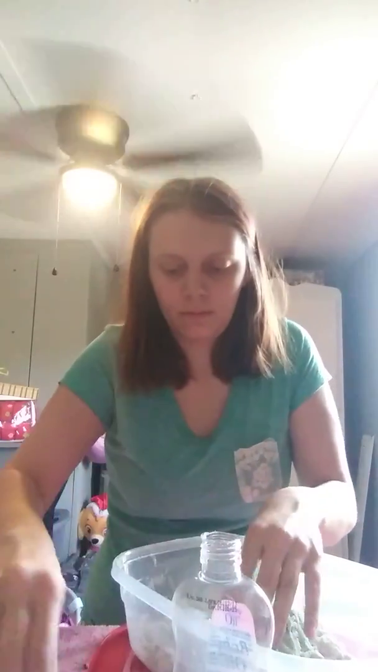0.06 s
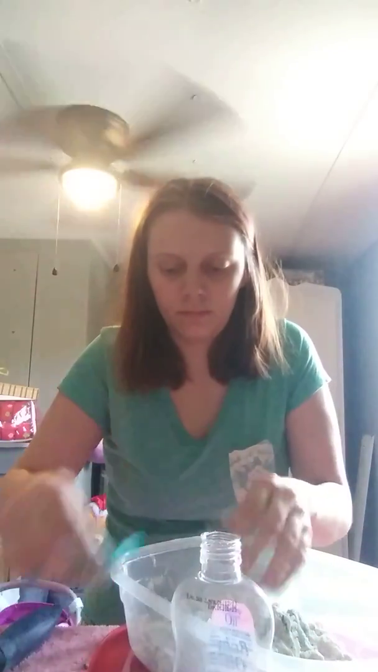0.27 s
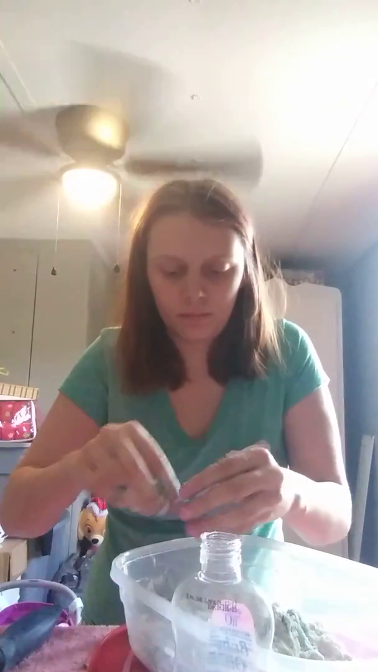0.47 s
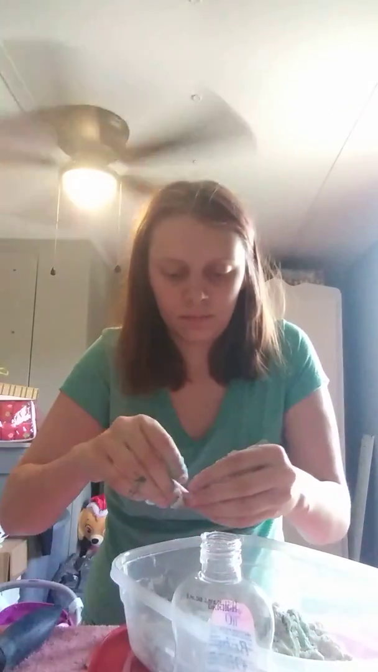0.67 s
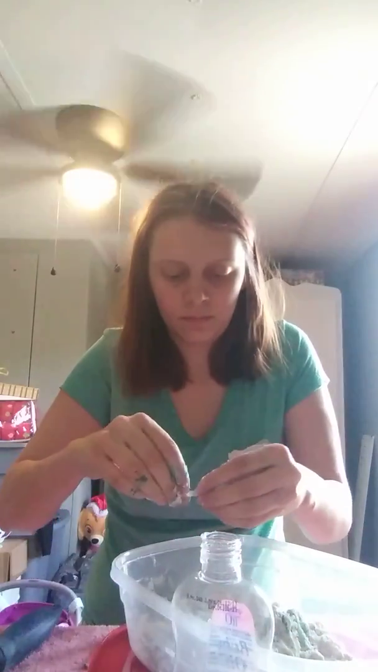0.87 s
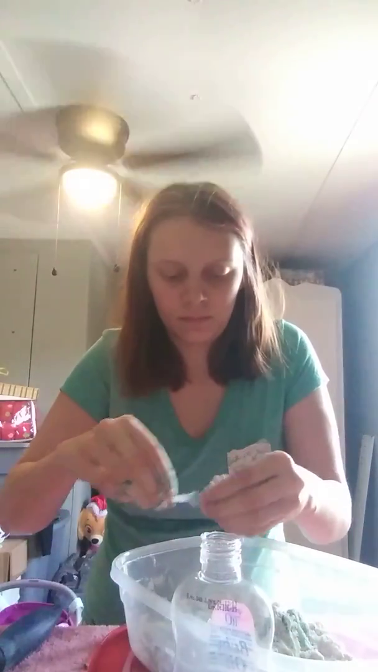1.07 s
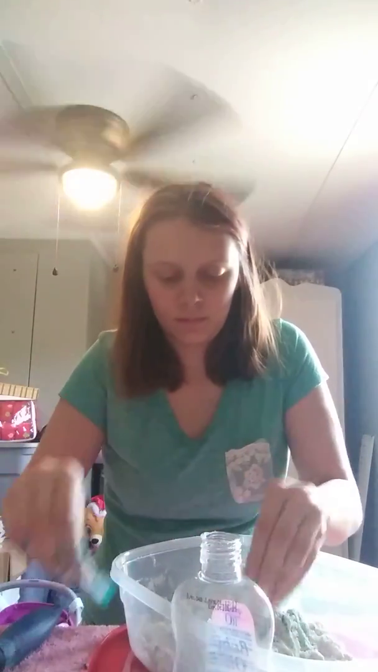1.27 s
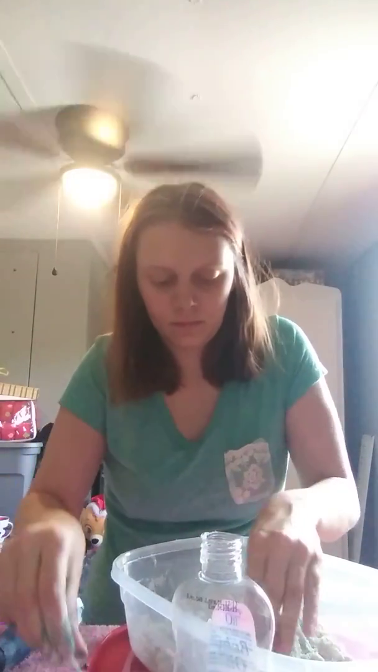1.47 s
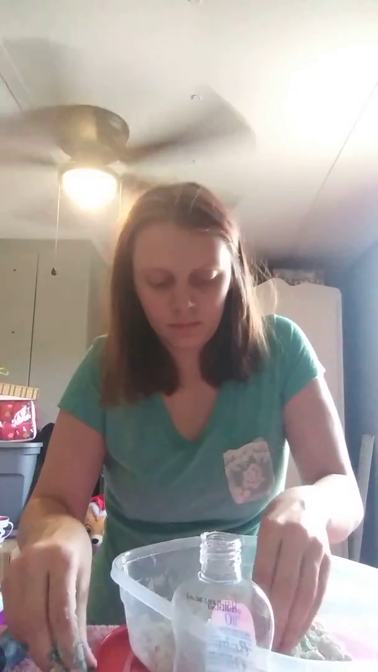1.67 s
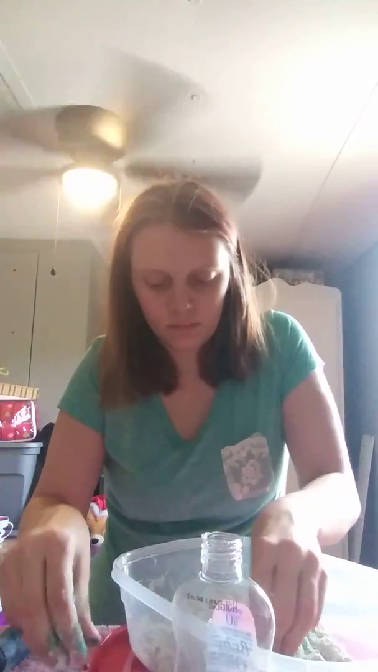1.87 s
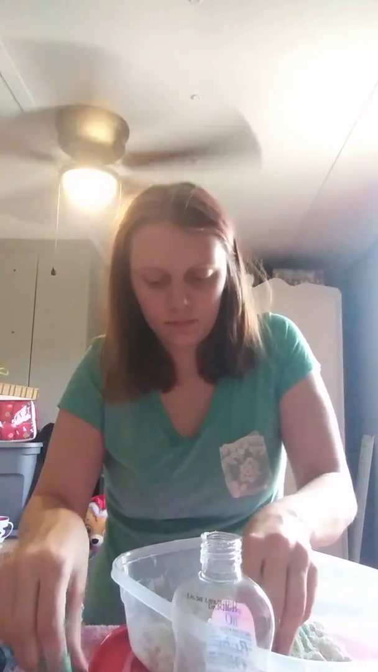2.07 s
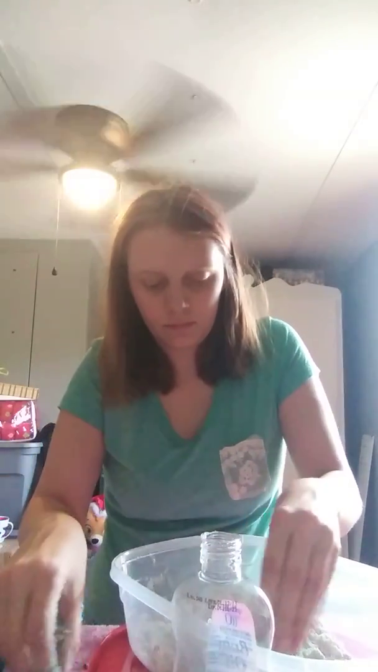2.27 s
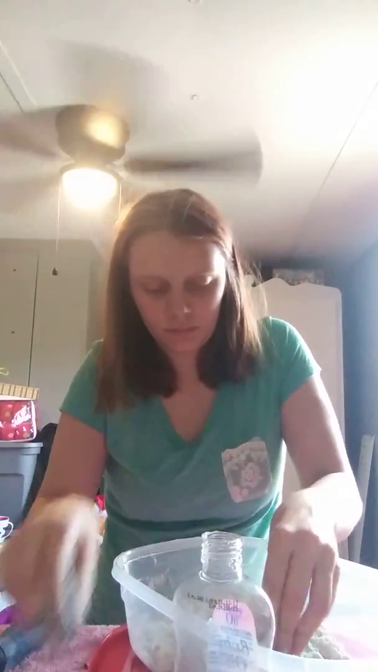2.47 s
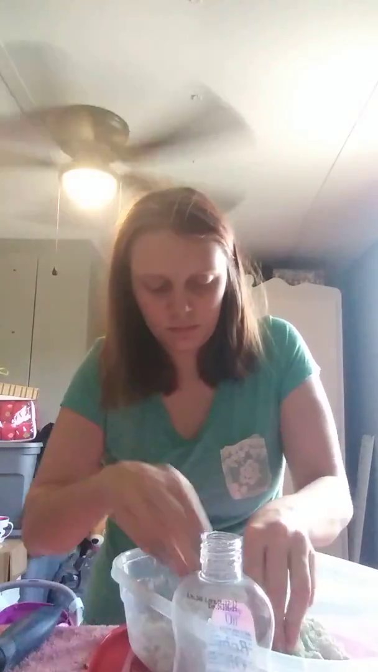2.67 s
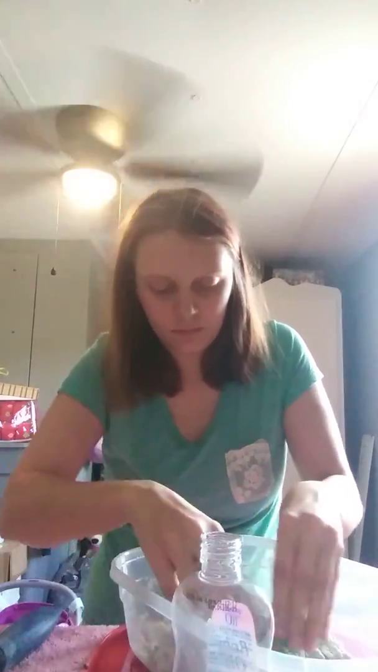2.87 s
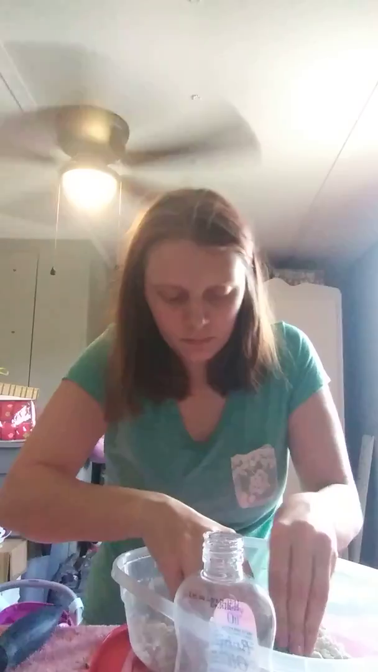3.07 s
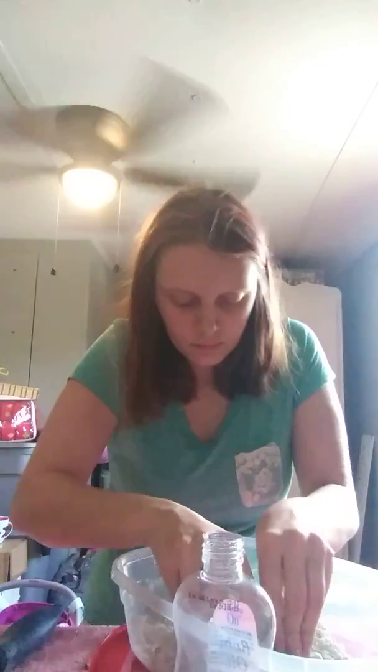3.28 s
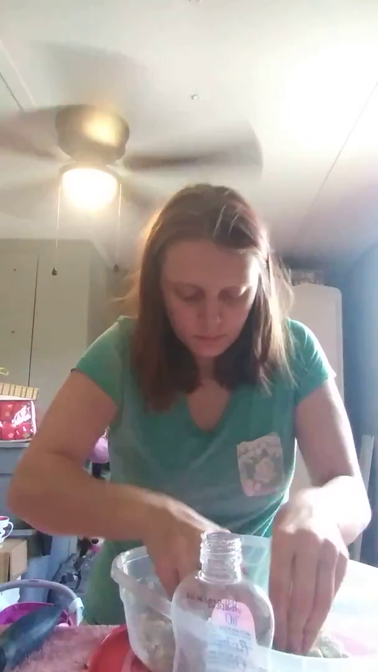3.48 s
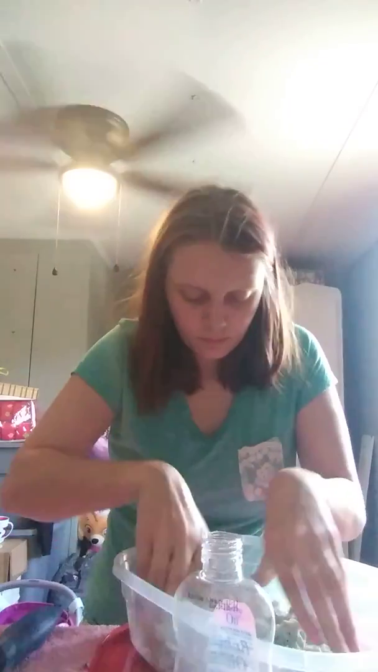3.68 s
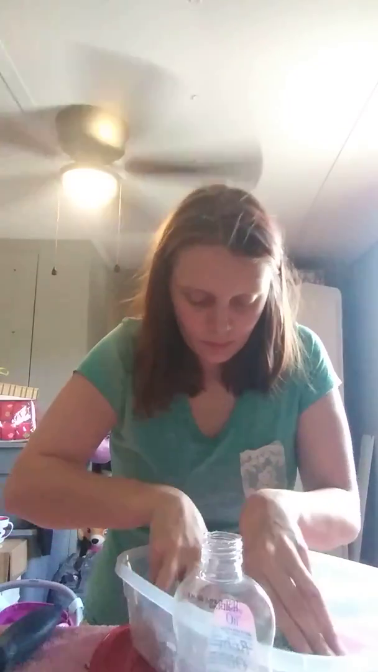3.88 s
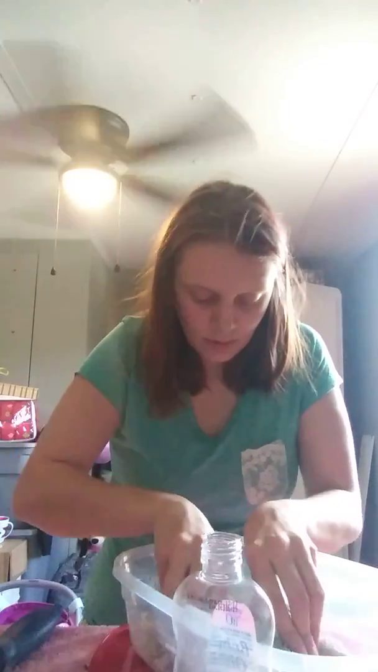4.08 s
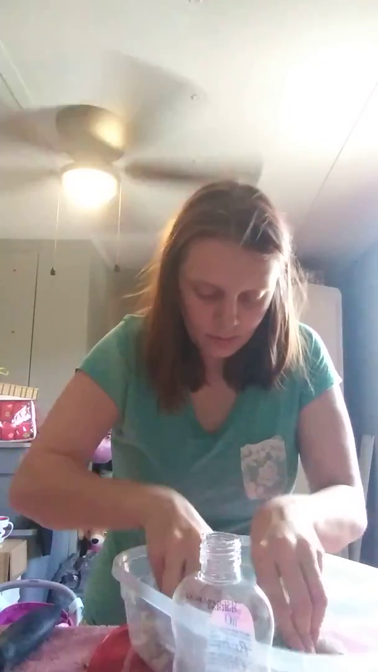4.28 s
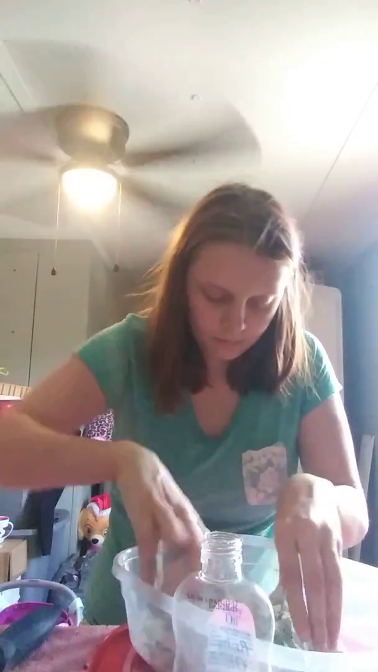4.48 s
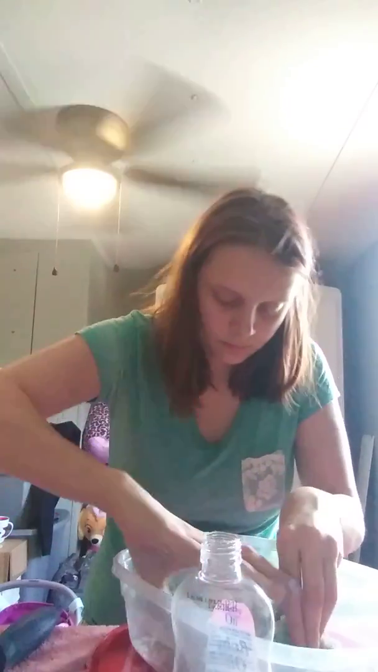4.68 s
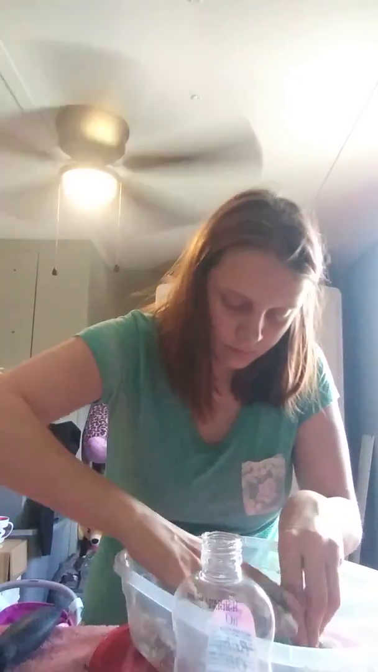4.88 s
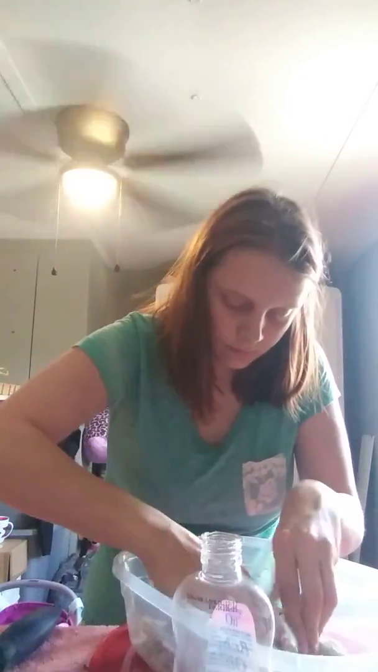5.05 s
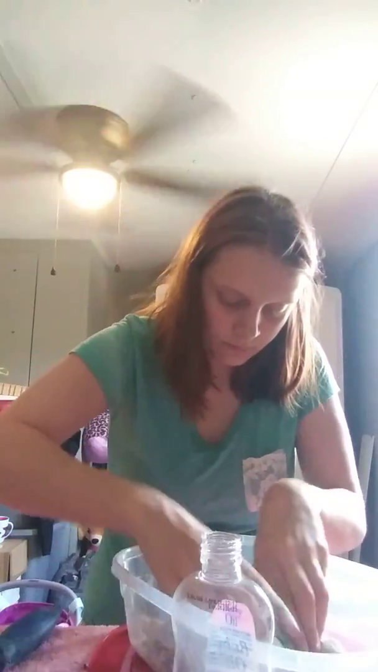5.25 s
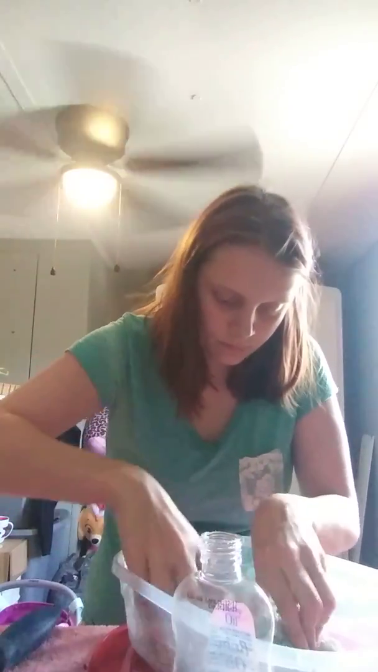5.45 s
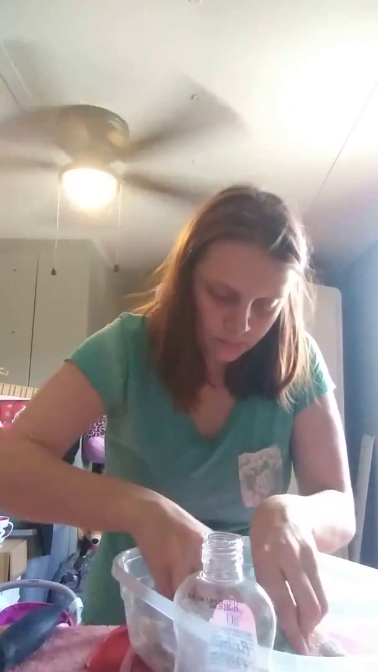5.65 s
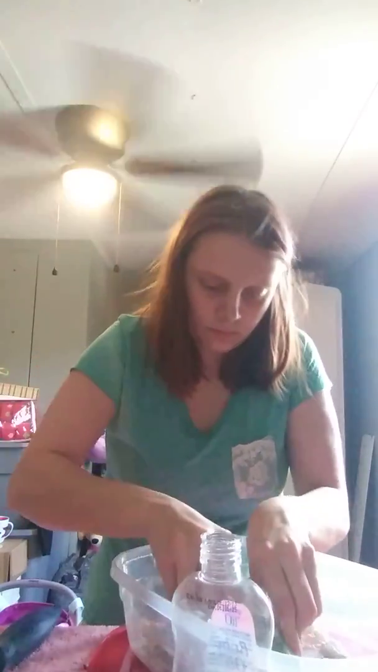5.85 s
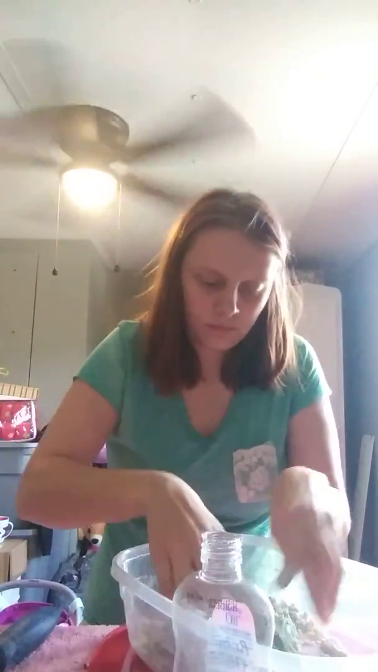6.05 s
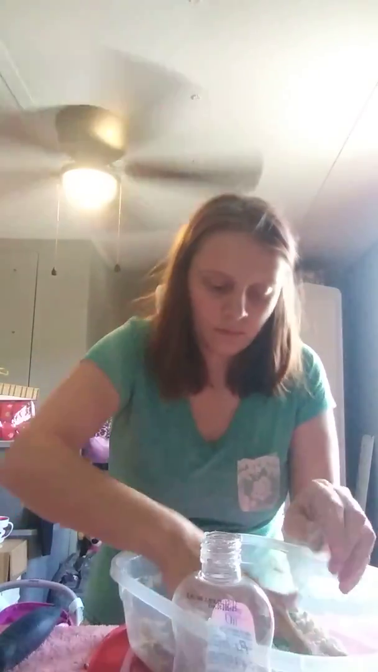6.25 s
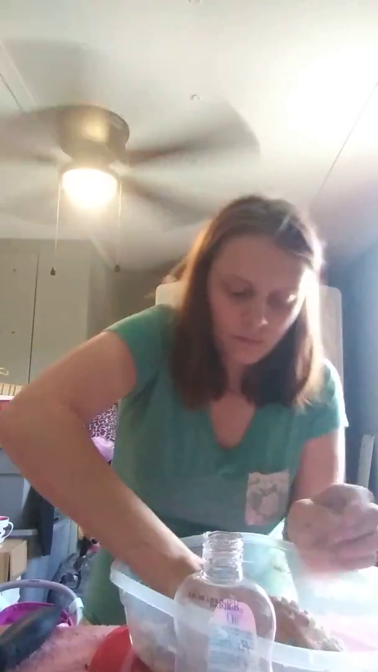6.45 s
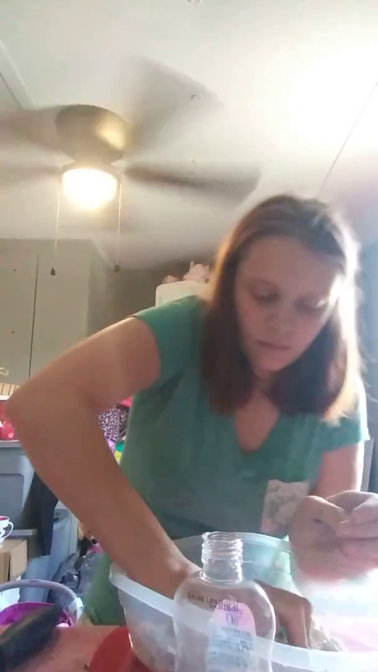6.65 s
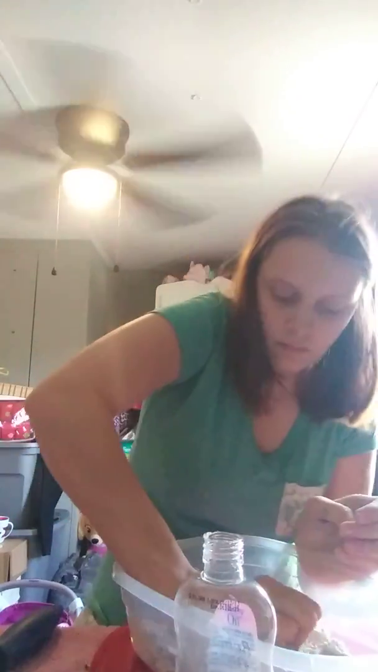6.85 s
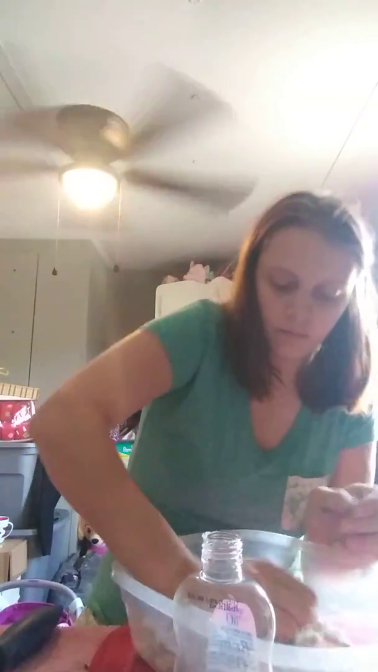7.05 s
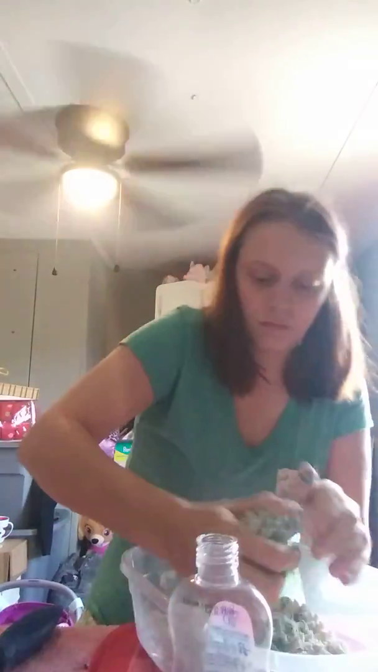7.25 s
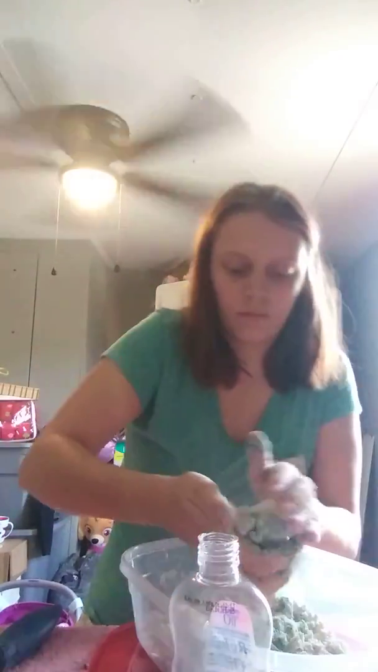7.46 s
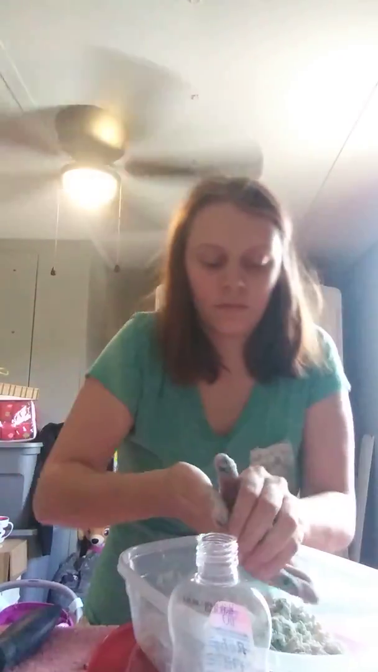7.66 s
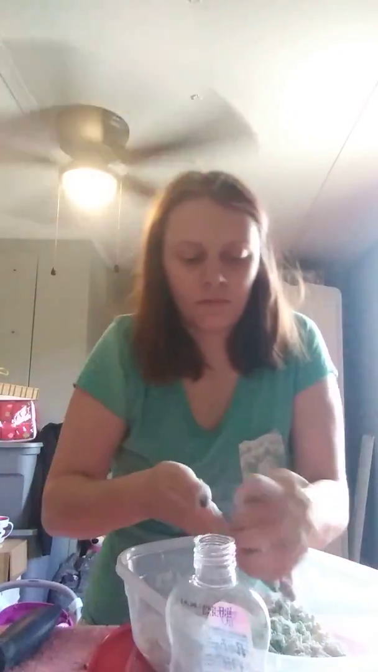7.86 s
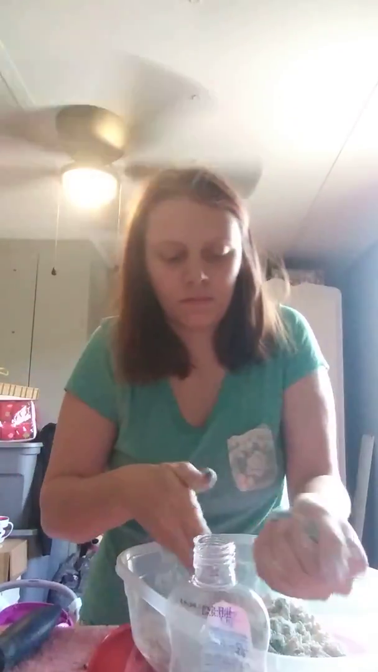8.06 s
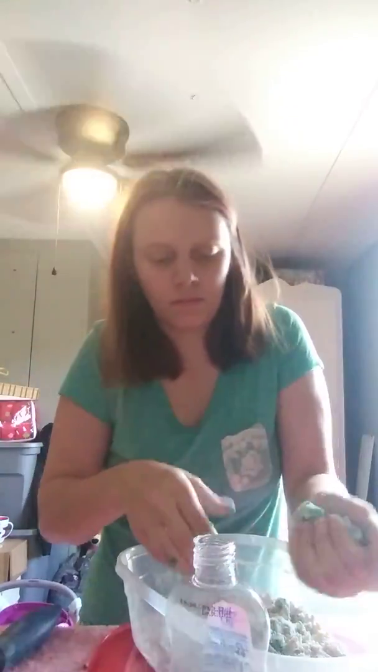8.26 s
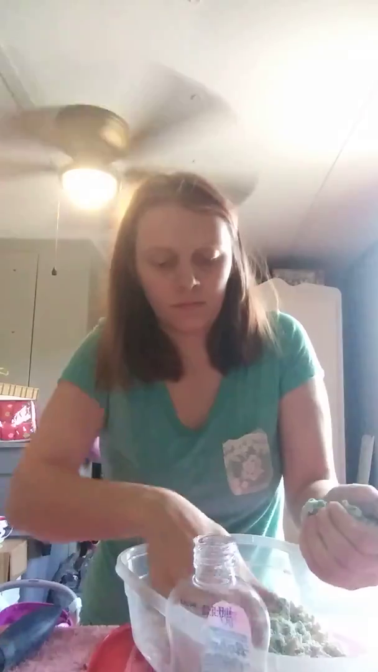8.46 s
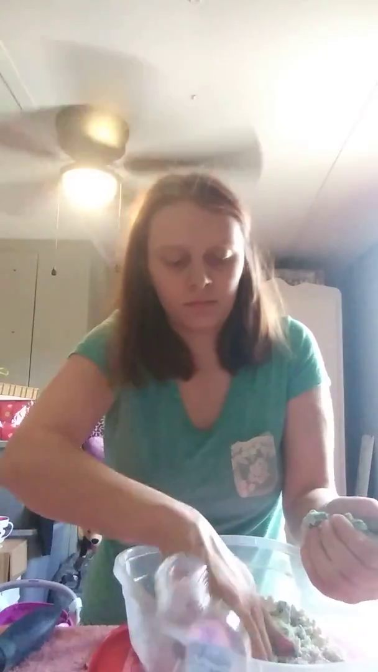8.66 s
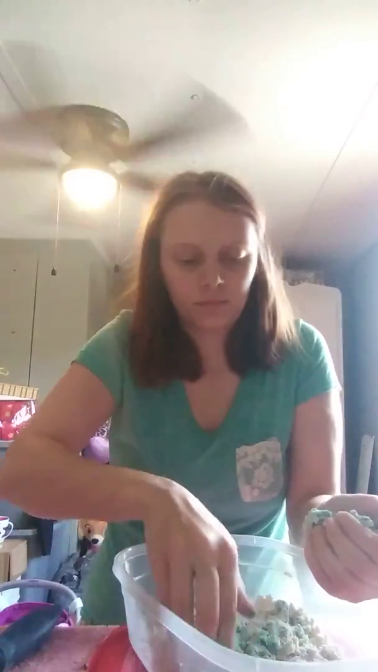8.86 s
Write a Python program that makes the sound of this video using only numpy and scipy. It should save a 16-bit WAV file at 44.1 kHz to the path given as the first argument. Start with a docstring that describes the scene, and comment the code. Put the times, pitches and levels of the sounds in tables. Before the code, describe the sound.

Fingers rub and scoop a crumbly, powdery mixture in a thin plastic tub, ticking its wall, with two hard table knocks over a low fan hum.

```python
"""A small room, at a table: hands squeeze and scoop a crumbly, sandy mixture in a thin plastic tub.
The phone's microphone lies close by on the table. Filtered grain noise rubs and hisses with each stroke,
damped modes make the flexing tub tick and, twice, hard knocks ring the table; narrowed noise squeaks
and rubs, and wavering sines thump low. Behind them a ceiling fan hums and whirs, built from wavering
sines and coloured noise, under faint high whistles made of unsteady sines."""
import sys
import numpy as np
from scipy import signal
from scipy.fft import rfft, irfft
from scipy.io import wavfile
from scipy.ndimage import uniform_filter1d, map_coordinates

SR = 44100
rng = np.random.default_rng(int(sys.argv[2]) if len(sys.argv) > 2 else 0)


def file_out(sig):
    """Save sig as 16-bit WAV at sys.argv[1]."""
    # one column per channel
    cols = np.atleast_2d(sig).T
    # limit, then scale
    lim = np.clip(cols, -1, 1)
    pcm = np.round(lim * 32767).astype(np.int16)
    wavfile.write(sys.argv[1], SR, pcm)


N = 393592
TIME = np.arange(N) / SR  # s

# fan motor's hum, which sinks and then slowly swells: [t/s, level/dB]
HUM_LEVEL = [(0.1, -45.5), (0.4, -49), (1.45, -53), (3.3, -48.5), (4.9, -42), (7.5, -39), (8.9, -37.6)]
# fan motor's overtones: [f/Hz, level/dB, flicker/dB]
MOTOR_OVERTONES = [(114.2, -67, 5), (336.4, -63, 6), (360, -64.5, 3), (480, -65.5, 7), (622, -71, 6),
                   (954, -73, 3.5)]
# spectrum of the moving air: [f/Hz, relative density/dB per Hz]
AIR_SPECTRUM = [(15, -60), (25, -26), (39, 0), (64, 7), (86, -24), (107, -13.5), (198, -18), (340, -19),
                (389, -17), (495, -20.5), (1570, -35), (4040, -42), (4620, -44), (6550, -42.5),
                (15500, -55)]
# thin, high whistles in the background: [f/Hz, level/dB]
WHISTLE_TONES = [(4190, -75), (6520, -80), (8080, -82), (9450, -83), (10600, -104)]
# spectrum of coarse crumbs, also used for grit on the tub wall: [f/Hz, relative density/dB per Hz]
CRUMB_SPECTRUM = [(150, 7), (400, 4.5), (750, 13), (1100, -2.5), (1700, 3.5), (2300, 0), (3500, 1),
                  (5500, -8), (7500, -46), (12000, -34)]
# spectrum of fine powder: [f/Hz, relative density/dB per Hz]
POWDER_SPECTRUM = [(3000, -18.5), (5500, -9.5), (7000, -3), (8000, -1), (9200, -10), (11000, -16),
                   (13000, -26), (16000, -26)]
# finger strokes through the mixture:
# [t of the height/s, length/s, crumb level/dB, powder level/dB, powder pitch ratio before blending]
FINGER_STROKES = [(0.087, .13, -59, -69, 0.97), (0.57, .12, -69, -68.5, 1.12),
                  (0.825, 0.094, -81, -68, 1.08), (1.139, .07, -80, -60, 1.1), (1.464, 0.086, -67, -66, 1),
                  (1.606, 0.087, -59, -59, 1), (2.191, 0.043, -52, -50, 1.02), (2.481, 0.14, -75, -71.5, 1),
                  (2.84, .11, -71, -63, 1.03), (3.078, 0.15, -57.5, -61, 0.99),
                  (3.199, 0.088, -55, -57, 0.94), (3.357, 0.31, -56, -56, 0.86),
                  (3.525, 0.11, -53.5, -58, 1.03), (3.791, 0.14, -50, -50, 1.03),
                  (3.923, 0.075, -52.5, -47, 1.01), (4.013, 0.12, -55, -55, 0.99),
                  (4.14, 0.092, -56.5, -57, 1.02), (4.46, 0.26, -65, -72, 1),
                  (4.761, 0.34, -59.5, -60.5, 0.99), (5.038, 0.3, -60, -61, 1.01),
                  (5.469, 0.095, -54.5, -54, 1.03), (5.628, 0.31, -55.5, -55.5, 0.94),
                  (5.879, 0.082, -55.5, -60.5, 1), (6.15, 0.06, -58.5, -63, 1.06),
                  (6.338, 0.27, -60, -63, 1), (6.61, 0.24, -58, -54.5, 1.05),
                  (6.828, 0.32, -59, -58.5, 1.01), (7.138, 0.19, -50.5, -53, 1.02),
                  (7.268, .09, -55, -51, 0.89), (7.58, 0.051, -52, -64, 1), (7.739, 0.12, -60.5, -60, 1.02),
                  (7.958, 0.18, -65, -64.5, 1), (8.334, 0.074, -65, -63.5, 1.05),
                  (8.428, 0.046, -60.5, -59.5, 0.9), (8.636, 0.1, -47.5, -52, 1),
                  (8.779, 0.16, -52.5, -44, 1.074), (8.847, 0.073, -54, -43.5, 1.07)]
# clumps that break up: [t/s, crumb level/dB, length/s, powder against crumbs/dB]
BREAKING_CLUMPS = [(1.429, -54, 0.015, -9), (3.743, -43.5, 0.01, -24), (3.821, -48, 0.023, -14),
                   (4.626, -40.5, 0.013, -20), (7.215, -37.5, .003, 7.5), (8.166, -57.5, 0.013, 1),
                   (8.414, -42.5, 0.0049, -8.5)]
# ticks of the tub wall under the fingers:
# [t/s, wall peak level/dB, snap of the upper modes/dB, main ring f/Hz]
WALL_TICKS = [(0.179, -34.5, -3, 740), (1.429, -30.5, 4, 754), (1.626, -34.5, -3, 737),
              (2.441, -34.5, 5, 680), (2.492, -36, -1.5, 707), (2.827, -37.5, 5, 740),
              (2.871, -28.5, 2.5, 732), (3.554, -37, -2, 737), (3.571, -35, -2, 676), (3.621, -40, 3, 704),
              (3.695, -37, -4, 760), (3.704, -29.5, -4, 728), (3.74, -29.5, 4, 910), (3.746, -35, 1, 732),
              (3.957, -29.5, 2, 700), (3.971, -36, -4, 747), (4.188, -43, -11, 716),
              (4.423, -32.5, -5, 701), (4.57, -36, 7, 723), (4.627, -42.5, 10, 681), (5.013, -36, -10, 741),
              (5.115, -28, -1, 722), (5.438, -27, 0.5, 735), (5.573, -27.5, 1.5, 709),
              (6.051, -32, -3, 700), (6.135, -31.5, -17, 735), (6.233, -31, -2.5, 693),
              (6.303, -33, -4, 717), (7.286, -23.5, 11.5, 682), (7.355, -37.5, 18, 740),
              (7.468, -38, -11, 727), (7.569, -25, 1.5, 715), (7.69, -39.5, -4, 747),
              (7.971, -40.5, -3, 730), (8.412, -41, 14.5, 690), (8.56, -35, -1, 740),
              (8.862, -28.5, -4, 714), (8.9204, -13, 2.5, 779)]
# the tub's modes, for a main ring at TUB_HZ: [f/Hz, relative level/dB, t60/s]
TUB_MODES = [(150, 2, 0.03), (260, -20, 0.054), (372, -24, 0.058), (504, -8, 0.096), (744, -7.5, 0.057),
             (720, 8.5, 0.045), (912, -7.5, 0.078), (1478, 3.5, 0.019), (1706, 6, 0.013),
             (1940, -38, 0.0093)]
# narrow noises: short squeaks on the plastic and one longer, smooth rubbing hiss:
# [t of the height/s, level scale/dB, time to 1/e on either side/s, f/Hz, nominal width/Hz]
NARROW_NOISES = [(0.54, -71, 0.034, 3780, 300), (3.363, -57, 0.16, 7100, 900),
                 (4.371, -57.5, .004, 2330, 893), (4.433, -62.5, 0.12, 2040, 450),
                 (4.491, -70, 0.098, 3070, 350), (4.627, -50, 0.009, 3300, 447),
                 (5.693, -60.5, 0.037, 3430, 250), (7.975, -51, 0.006, 2030, 707),
                 (8.636, -51.5, 0.012, 2670, 1001), (8.848, -50, 0.029, 11670, 1976)]
# dull low thumps: presses on the tub's bottom, and the low body of the table knock:
# [t/s, level scale/dB, length/s, mean f/Hz]
LOW_THUMPS = [(1.632, -57, 0.017, 130.6), (2.184, -49, 0.026, 146), (3.089, -50, 0.027, 385),
              (3.17, -49.5, 0.035, 393), (3.485, -45.5, 0.025, 418), (3.737, -39, 0.015, 350),
              (3.775, -44, 0.013, 350), (3.817, -52, 0.037, 361), (4.63, -49, 0.012, 168.3),
              (7.213, -34, 0.01, 141.2), (7.207, -35, 0.018, 320), (7.572, -39.5, 0.016, 348.6),
              (8.672, -38.5, 0.01, 140.7), (8.673, -33.5, 0.0036, 268)]
# hard knocks on the table and their rebounds: [t/s, ring peak level/dB, crack level scale/dB]
TABLE_KNOCKS = [(7.2096, -8, -17), (7.2123, -16.5, -26.5), (7.215, -19.5, -24.5), (7.2228, -22, -24),
                (8.9199, -21, -12.5)]
# the table's modes: [f/Hz, relative level/dB, t60/s]
TABLE_MODES = [(154, -7, 0.079), (254, -41, 0.055), (340, -18, 0.12), (381, -4.5, 0.14), (473, -4, 0.14),
               (600, 5, 0.072), (695, 4.5, 0.055), (748, -0.5, 0.066), (1400, -11, 0.044),
               (1440, 14.5, 0.012), (1787, 6.5, 0.014), (2400, -27, 0.031), (3020, -6.5, 0.046),
               (4060, -38, 0.015)]
# spectrum of the knocks' crack: [f/Hz, relative density/dB per Hz]
CRACK_SPECTRUM = [(100, -2), (250, -3.5), (500, 9.5), (900, 4), (1400, -16), (2200, -4), (4000, -4.5),
                  (6000, -11.5), (7900, -6), (9500, -15.5), (12000, -24.5), (16000, -40)]

HUM_HZ = 58.3
HUM_WAVER_DB = -65  # an unsteadiness of constant size, heard most while the hum is weak
AIR_DB, AIR_PER_HUM = -56.5, 0.23  # 200-900 Hz level at the hum's mean dB; dB gained per dB of hum
WHISTLE_FLICKER_DB = 5.5
RISE_SHARE = 0.44  # of a stroke's length; the rest is its release
REST_CRUMBS_DB, REST_POWDER_DB = -70.5, -74  # the fingers never lie quite still
SLIP_DB, SLIPS_PER_S = 1.3, 45  # unevenness within a stroke
TUB_HZ = 721
# grit scale against the tick in dB; its extra dB per dB of snap; its decay to 1/e in s
GRIT_DB, GRIT_PER_SNAP, GRIT_S = -17, 0.64, 0.0038
CRACK_S = 0.0013  # decay to 1/e
ROOM_T60 = 0.3  # s
TOP_HZ = 15750  # upper edge of the phone's passband


def amp(db):
    """Amplitude ratio of a level in dB."""
    return 10 ** (np.asarray(db) / 20)


def unit(x):
    """Scale to an RMS of 1."""
    return x / np.sqrt(np.mean(x ** 2))


def decay(t, t60):
    """Exponential fall of 60 dB in t60 seconds."""
    return np.exp(-np.log(1000) * t / t60)


def add(track, s, sound):
    """Mix a sound into a track at a time in seconds."""
    start = int(s * SR)
    part = sound[:max(N - start, 0)]
    track[start:start + len(part)] += part


def response(points, size=2048):
    """Causal, minimum-phase impulse response of unit energy with the given spectrum."""
    hz, db = np.transpose(points)
    log_hz = np.log(np.fft.rfftfreq(size, 1 / SR) + 1)
    gain = amp(np.interp(log_hz, np.log(hz), db))
    cepstrum = irfft(np.log(gain))
    # folding the cepstrum forward in time makes the response causal
    cepstrum[1:size // 2] *= 2
    cepstrum[size // 2 + 1:] = 0
    impulse = irfft(np.exp(rfft(cepstrum)))
    return impulse / np.linalg.norm(impulse)


def colour(x, points):
    """Filter a sound to the given spectrum."""
    return signal.fftconvolve(x, response(points))[:len(x)]


def band(x, lo_hz, hi_hz):
    """Keep the range between two frequencies."""
    edges = [lo_hz, min(hi_hz, SR / 2 - 1)]
    return signal.sosfilt(signal.butter(2, edges, "band", fs=SR, output="sos"), x)


def walk(rate):
    """Smoothed random wandering with an RMS of 1 and `rate` new values per second."""
    hold = max(int(SR / rate), 1)
    steps = np.repeat(rng.standard_normal(N // hold + 1), hold)
    return unit(uniform_filter1d(steps, hold)[:N])


def flutter(hz, flicker_db, wander_hz):
    """A thin tone, unsteady in pitch and level."""
    phase = 2 * np.pi * np.cumsum(hz + wander_hz * walk(150)) / SR
    flicker = 0.7 * walk(32) + 0.7 * walk(90)
    return unit(np.sin(phase) * amp(flicker_db * np.minimum(flicker, 1.5)))


def grains(rate, spread_db):
    """Random tiny impacts, `rate` per second, most weak and a few strong."""
    hit = rng.random(N) < rate / SR
    size_db = spread_db * np.minimum(rng.exponential(size=N), 5)
    return unit(hit * np.sign(rng.standard_normal(N)) * amp(size_db))


def ring(modes, t, detune):
    """Damped sines, one row per mode."""
    hz, db, t60 = np.transpose(modes)[:, :, None]
    return amp(db) * np.sin(2 * np.pi * hz * detune[:, None] * t) * decay(t, t60)


def swell(s, length):
    """A push that rises quickly to 1 and dies away."""
    age = np.maximum(TIME - s, 0) / length
    return np.sqrt(2 * np.e * age) * np.exp(-age)


def fan():
    """A ceiling fan: motor hum, fluttering overtones and the soft noise rush of its blades."""
    hum_db = np.interp(TIME, *np.transpose(HUM_LEVEL))
    hum_phase = 2 * np.pi * np.cumsum(HUM_HZ + 0.15 * walk(2.58)) / SR
    hum = unit(np.sin(hum_phase)) * (amp(hum_db) + amp(HUM_WAVER_DB) * walk(14))
    overtones = sum(amp(db) * flutter(hz, flicker_db, wander_hz=1.39)
                    for hz, db, flicker_db in MOTOR_OVERTONES)
    air = band(colour(rng.standard_normal(N), AIR_SPECTRUM), 164, 20000)
    air = air / np.std(band(air, 200, 900))
    air_db = AIR_DB + AIR_PER_HUM * (hum_db - hum_db.mean())
    return hum + overtones + air * amp(air_db + 0.5 * walk(13))


def whistles():
    """Faint high sines whose pitch and level never quite hold still."""
    return sum(amp(db) * flutter(hz, WHISTLE_FLICKER_DB, wander_hz=35.3) for hz, db in WHISTLE_TONES)


def stroke(s, length):
    """A smooth push of the fingers: it builds to 1 and lets go a little more slowly."""
    side = length * np.where(TIME < s, RISE_SHARE, 1 - RISE_SHARE)
    return np.exp(-((TIME - s) / side) ** 2)


def mixture():
    """Crumbs rub and fine powder hisses in uneven slips with each stroke; now and then a clump gives way."""
    rub_power, hiss_power = amp(REST_CRUMBS_DB) ** 2, amp(REST_POWDER_DB) ** 2
    bend = 0
    for s, length, crumbs_db, powder_db, pitch in FINGER_STROKES:
        push = stroke(s, length) ** 2
        powder_power = push * amp(powder_db) ** 2
        rub_power = rub_power + push * amp(crumbs_db) ** 2
        hiss_power = hiss_power + powder_power
        bend = bend + powder_power * (pitch - 1)
    speed = 1 + bend / hiss_power  # power-weighted pitch: faster slips hiss higher

    slips = amp(SLIP_DB * walk(SLIPS_PER_S))
    rub, hiss = np.sqrt(rub_power) * slips, np.sqrt(hiss_power) * slips
    for s, db, length, powder_db in BREAKING_CLUMPS:
        burst = amp(db) * swell(s, length / 2)
        rub, hiss = rub + burst, hiss + burst * amp(powder_db)

    crumbs = colour(grains(rate=4500, spread_db=2.5), CRUMB_SPECTRUM)
    crumbs = crumbs * amp(1.24 * walk(160))  # crumbs catch and let go in groups
    powder = colour(grains(rate=18000, spread_db=3.5), POWDER_SPECTRUM)
    powder = map_coordinates(powder, [np.cumsum(speed) % (N - 1)], order=3)  # read at varying speed
    return rub * crumbs + hiss * powder


def tub():
    """Each flex rings the wall; a sharper snap favours the upper modes and shakes more grit against it."""
    out, t = np.zeros(N), TIME[:SR // 8]
    upper = np.transpose(TUB_MODES)[0] > 1200
    for s, db, snap_db, hz in WALL_TICKS:
        # the hands load the wall differently each time
        level_chance, pitch_chance = rng.standard_normal((2, len(TUB_MODES)))
        weights = amp(upper * snap_db + 2.3 * level_chance)
        wall = weights @ ring(TUB_MODES, t, hz / TUB_HZ + 0.022 * pitch_chance)
        wall = band(band(wall, 36, 2700), 36, 2700)  # soft fingers blunt the attack
        grit = colour(rng.standard_normal(len(t)) * np.exp(-t / GRIT_S), CRUMB_SPECTRUM)
        grit_gain = amp(GRIT_DB + GRIT_PER_SNAP * snap_db)
        add(out, s, amp(db) * (wall / np.abs(wall).max() + grit_gain * grit))
    return out


def narrow_noises():
    """Short squeaks and one longer, smooth rubbing hiss: narrowed noise that swells and fades."""
    noise, out = rng.standard_normal(N), np.zeros(N)
    for s, db, length, hz, width in NARROW_NOISES:
        peak = signal.iirpeak(hz, hz / (1.3 * width), fs=SR)  # wider, as two passes narrow it
        tone = signal.lfilter(*peak, signal.lfilter(*peak, noise))
        out += amp(db) * np.exp(-((TIME - s) / length) ** 2) * unit(tone)
    return out


def low_thumps():
    """Dull low thumps, presses on the tub's bottom and the table knock's low body: brief wavering sines."""
    turns = np.cumsum(1 + 0.14 * walk(250)) / SR  # shared pitch wavering
    out = np.zeros(N)
    for s, db, length, hz in LOW_THUMPS:
        thump = unit(np.sin(2 * np.pi * hz * turns))
        out += amp(db) * swell(s, length / 2) * thump
    return out


def knocks():
    """A hard contact cracks and rings the modes of the table top, then rebounds."""
    out, t = np.zeros(N), TIME[:SR // 3]
    body = ring(TABLE_MODES, t, np.ones(len(TABLE_MODES))).sum(0)
    body = body / np.abs(body).max()
    # after the crack, loose grains jump in the tub
    contact = np.exp(-t / CRACK_S) + amp(-14) * np.exp(-t / 0.043)
    for s, ring_db, crack_db in TABLE_KNOCKS:
        crack = colour(np.sign(rng.standard_normal(len(t))) * contact, CRACK_SPECTRUM)
        add(out, s, amp(ring_db) * body + amp(crack_db) * crack)
    return out


def room(x, wet_db, t60):
    """The walls of a small room return a short, diffuse tail of decaying noise."""
    t = TIME[:SR // 2]
    tail = band(rng.standard_normal(len(t)), 180, 13600) * decay(t, t60)
    tail = tail * (t > 0.005)  # the first return comes after 5 ms
    return x + amp(wet_db) * signal.fftconvolve(x, tail / np.linalg.norm(tail))[:N]


def scene():
    """Close sounds and table knocks in the room, with the fan and whistles behind, on one channel."""
    close = room(mixture() + tub() + narrow_noises() + low_thumps(), wet_db=-11.0, t60=ROOM_T60)
    table = room(knocks(), wet_db=-14.0, t60=ROOM_T60)  # reaches the phone mostly through the table top
    return (fan() + whistles() + close + table)[None]


def record(dry):
    """The phone cuts the top of the treble with a steep low-pass."""
    lowpass = signal.ellip(10, 0.2, 70, TOP_HZ, fs=SR, output="sos")
    return signal.sosfilt(lowpass, dry)


dry = scene()
out = record(dry)
file_out(out)
```